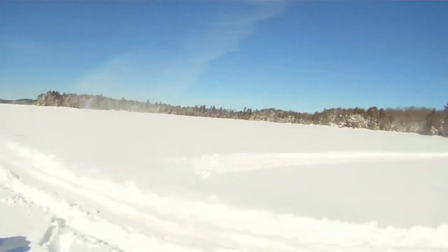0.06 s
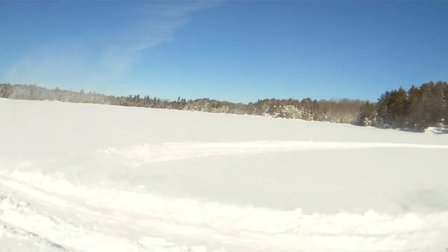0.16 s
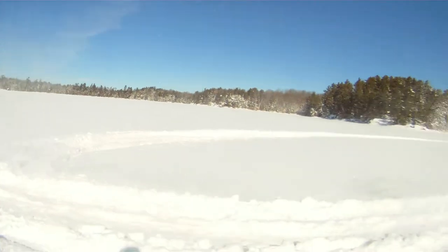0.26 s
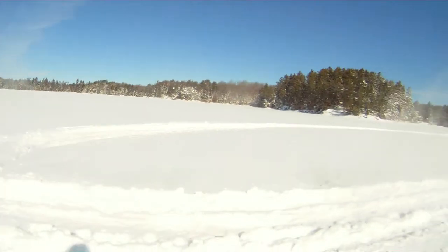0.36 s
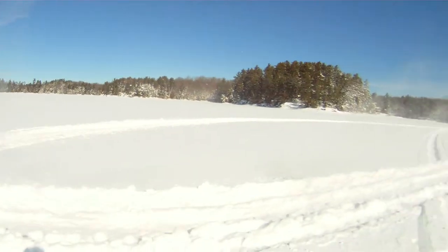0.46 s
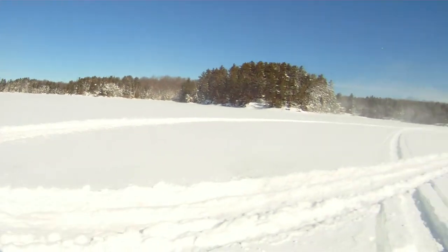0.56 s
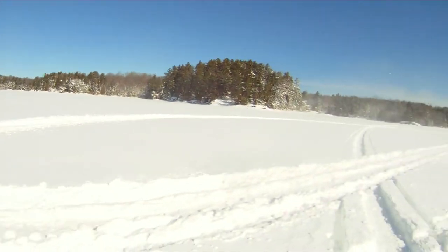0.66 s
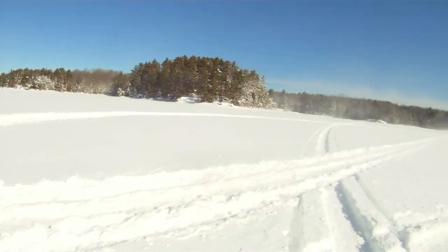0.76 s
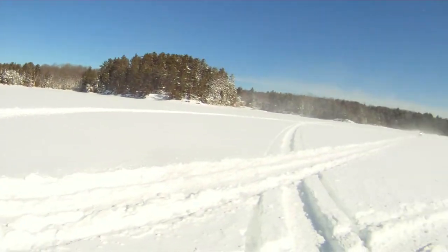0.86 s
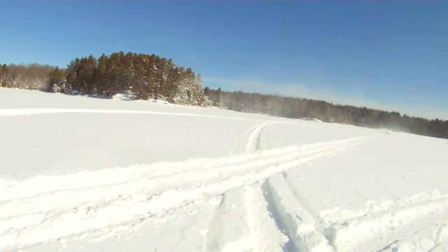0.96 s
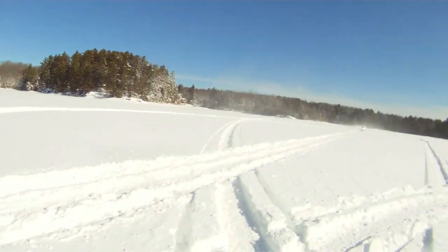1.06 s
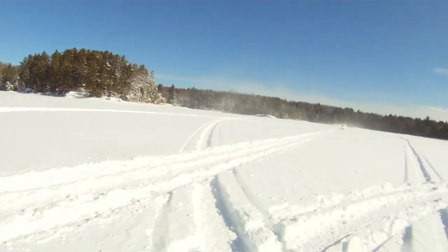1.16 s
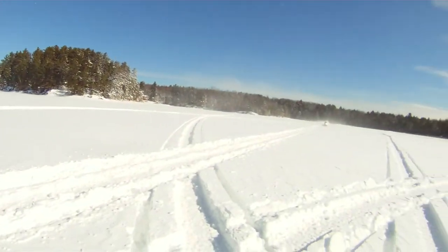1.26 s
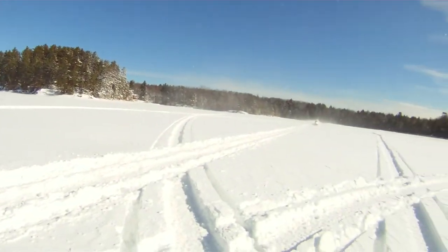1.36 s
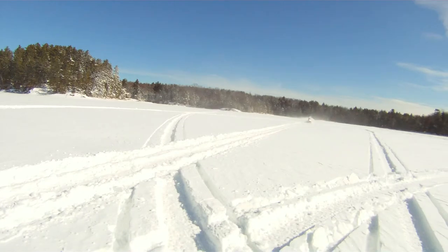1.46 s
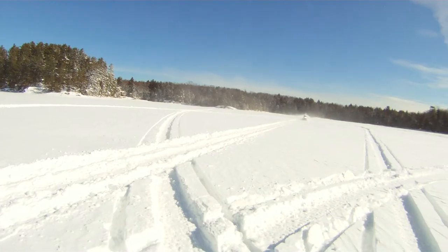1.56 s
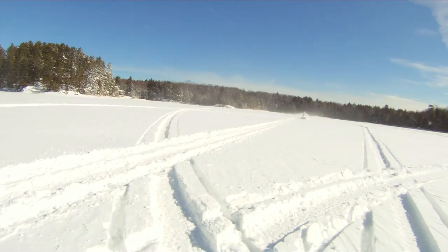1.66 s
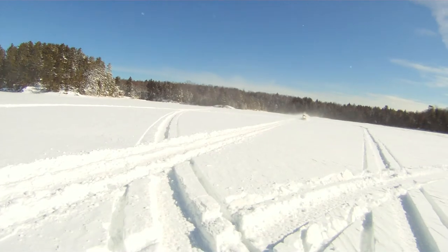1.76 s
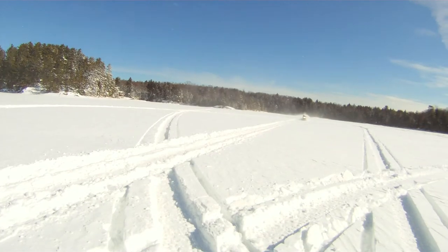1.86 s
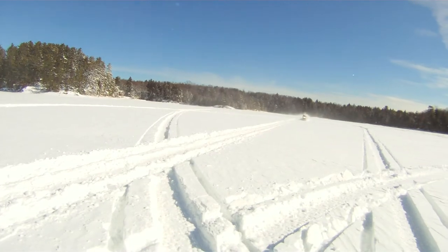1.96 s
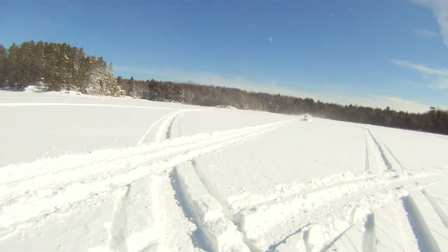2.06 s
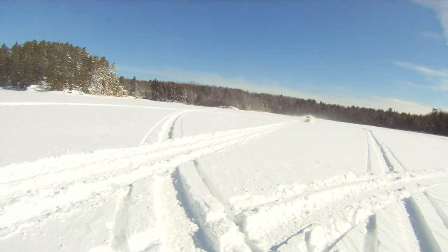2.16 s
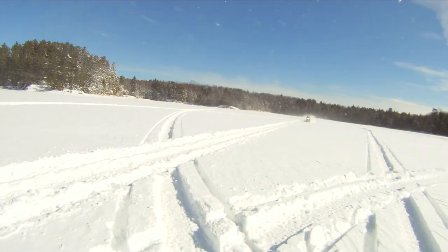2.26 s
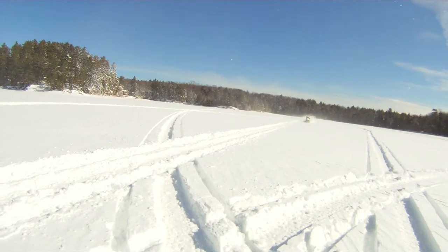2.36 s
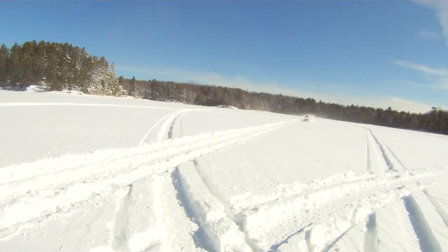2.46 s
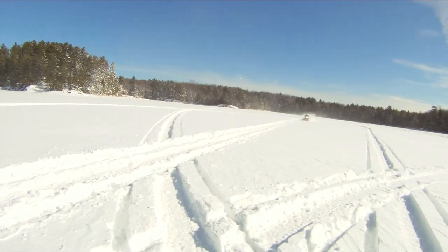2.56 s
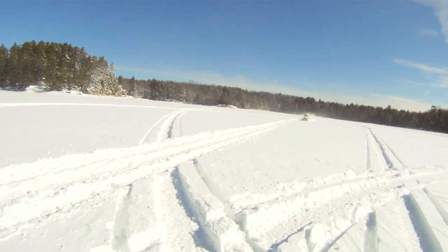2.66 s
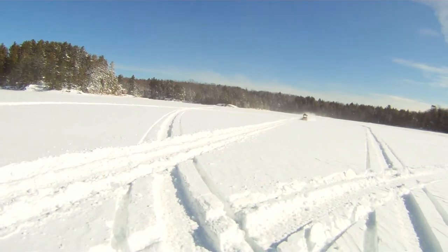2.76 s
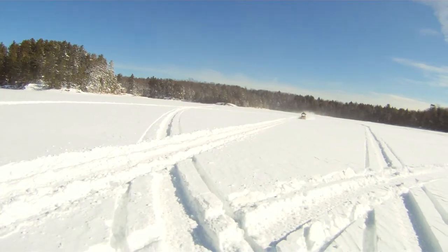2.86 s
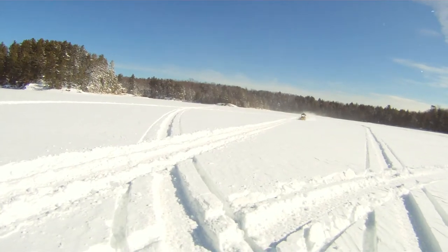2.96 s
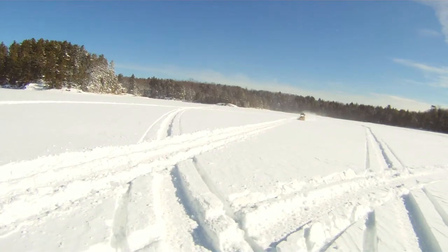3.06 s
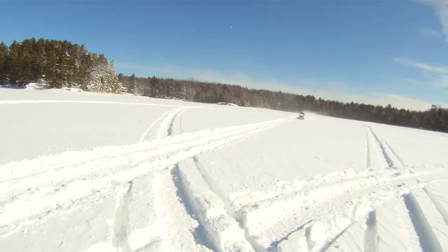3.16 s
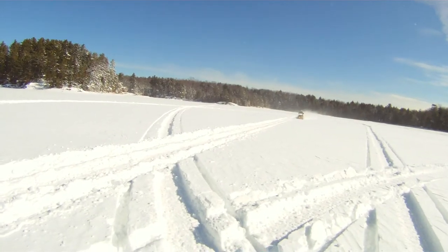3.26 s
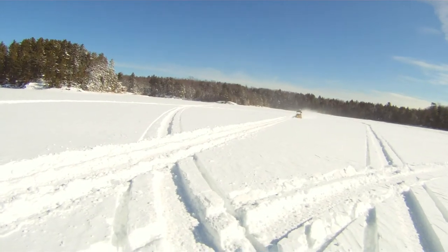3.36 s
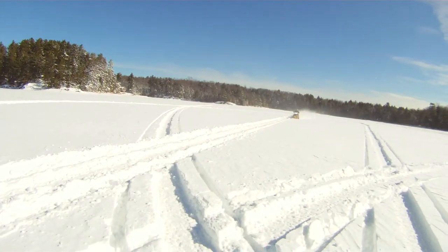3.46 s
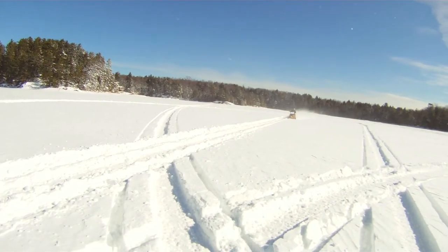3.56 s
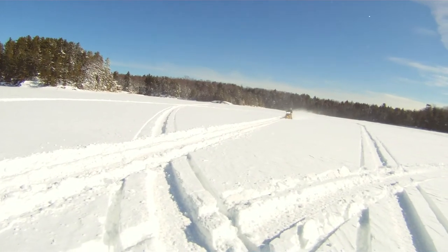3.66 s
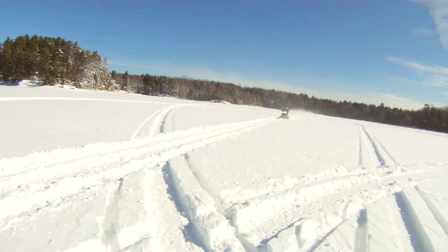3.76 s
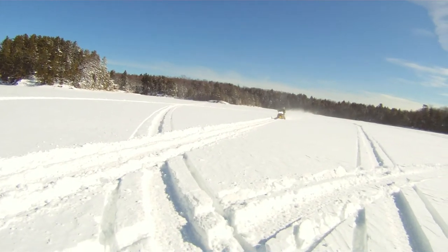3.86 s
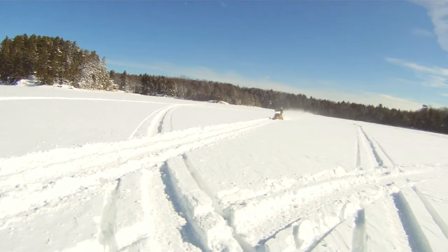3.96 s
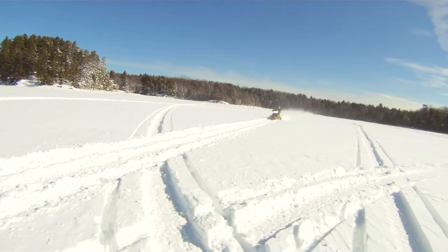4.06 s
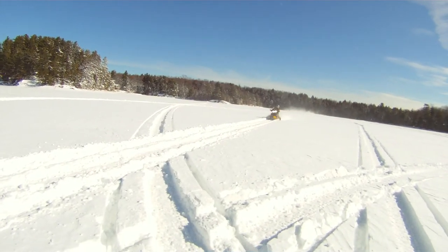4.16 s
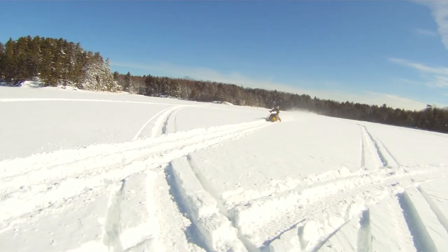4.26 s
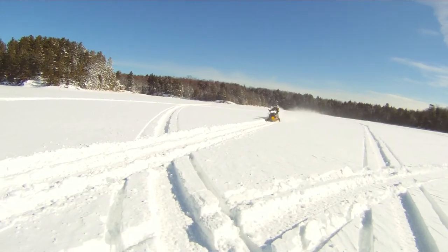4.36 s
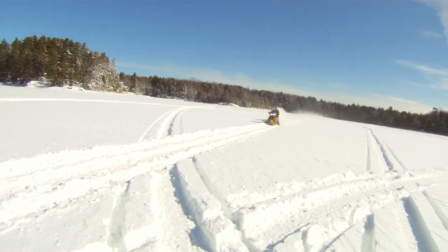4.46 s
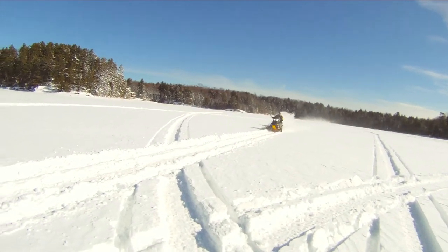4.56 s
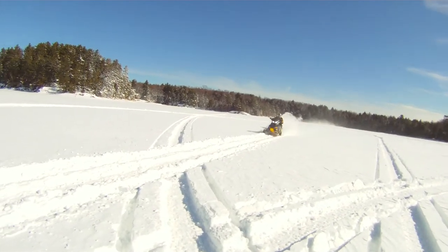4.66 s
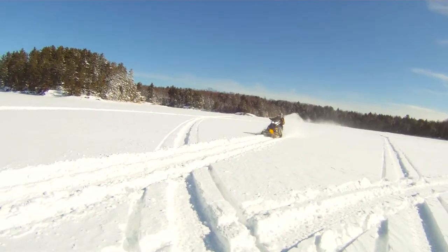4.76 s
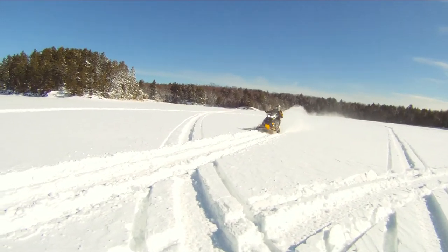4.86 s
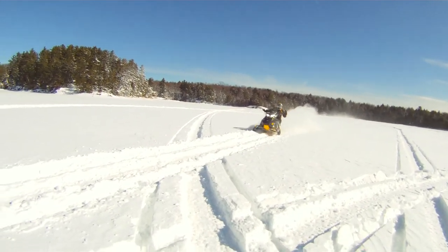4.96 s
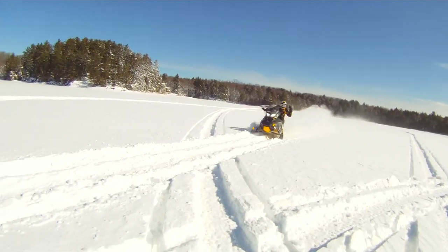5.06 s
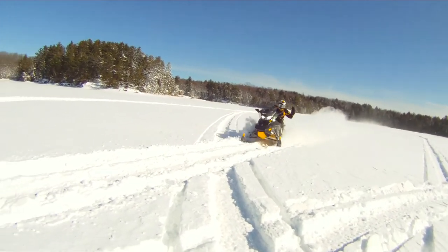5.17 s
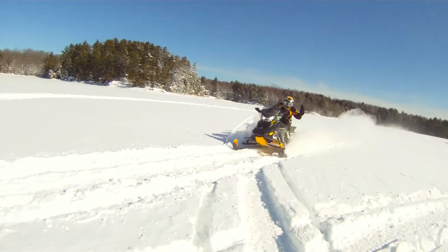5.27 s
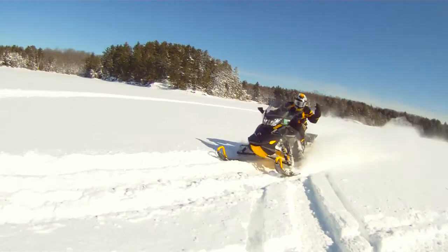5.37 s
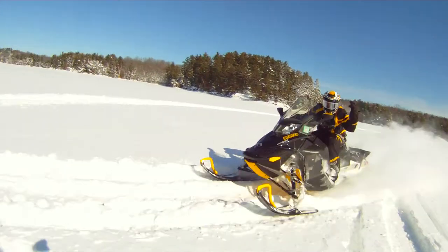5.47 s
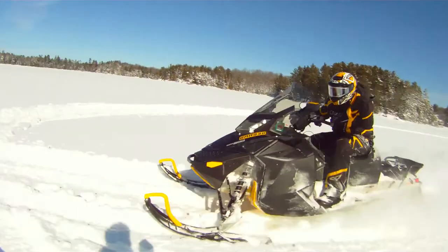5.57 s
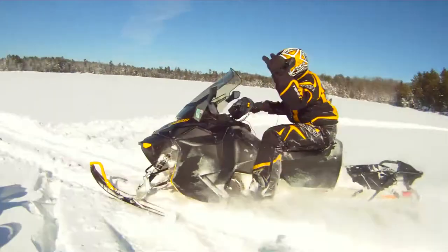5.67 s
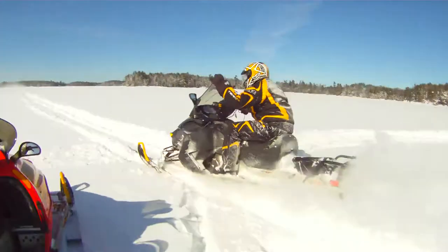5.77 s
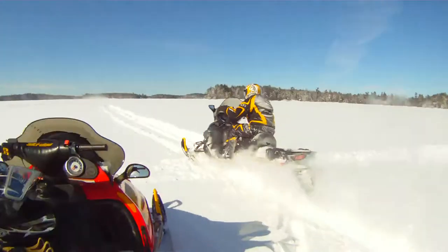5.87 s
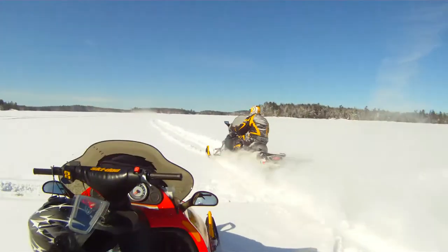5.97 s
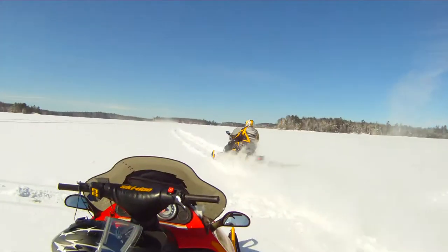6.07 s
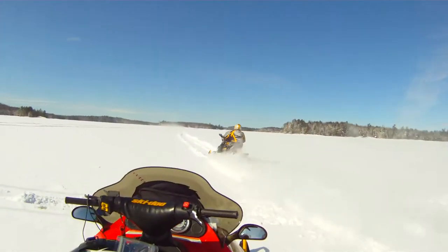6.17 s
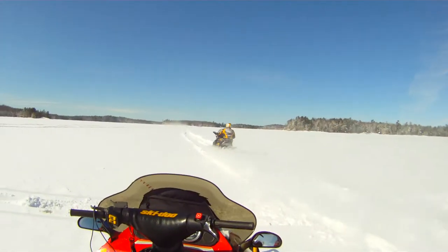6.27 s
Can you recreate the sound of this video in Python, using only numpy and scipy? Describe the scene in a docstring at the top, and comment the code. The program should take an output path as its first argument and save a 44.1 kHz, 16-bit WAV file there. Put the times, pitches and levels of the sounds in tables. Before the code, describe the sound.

On a quiet frozen lake one sled's thin buzz fades out, another builds to a raspy, clattering close pass and falls lower as it leaves.

```python
"""Open snow on a frozen lake, two snowmobiles, a small camera with faint hiss, whine, ticks and soft buffets.
At first one sled drones away from about 33 m: a thin two-stroke note over fading track clatter and snow hiss.
From about 2.7 s a second takes over, some 70 m out; its muffled treble opens up near 4 s, its throttle eases
near 4.5 s, and at 5.8 s it races by 4 m from the microphone and drops in pitch. Exhausts are harmonics of
the crankshaft, the track is a hum of its lugs with coloured noise for clatter, and thrown snow is a hiss."""
import sys
import numpy as np
from scipy import signal
from scipy.fft import rfft, irfft, next_fast_len
from scipy.io import wavfile

SR = 44100
rng = np.random.default_rng(int(sys.argv[2]) if len(sys.argv) > 2 else 0)


def generate_wav(sig):
    """Save sig (samples, or channels by samples) to the path in sys.argv[1] as 16-bit PCM at SR."""
    pcm = np.round(np.clip(np.atleast_2d(sig).T, -1, 1) * 32767).astype(np.int16)
    wavfile.write(sys.argv[1], SR, pcm)


N = 278271
TIME = np.arange(N) / SR  # [s]

# Spectra give relative levels: each finished note or noise is scaled to rms 1 before its own level is set.
# camera hiss: (frequency [Hz], density [dB per Hz])
CAMERA_HISS = [(30, -14), (90, -16), (250, -27), (600, -7), (1500, 9), (3200, -1.5), (5000, 2), (7300, -2),
               (8700, -2), (9400, -9), (10200, -4), (12000, -10), (14500, -5), (15500, -18)]
# whine of the camera's electronics: (frequency [Hz], rms level [dB])
WHINE = [(7838, -90), (7897, -72), (7957, -93)]
# colour of the low buffets: (frequency [Hz], density [dB per Hz])
BUFFET_COLOUR = [(25, -26), (45, 0), (70, -0.5), (150, 2), (280, -1), (450, -5.5), (900, -12)]
# soft low buffets on the camera: (time [s], half length [s], level [dB])
BUFFETS = [(0.659, 0.0061, -62.5), (0.724, 0.01, -63), (1.62, 0.034, -76), (2.462, 0.037, -71.5),
           (2.616, 0.047, -73.5), (2.761, 0.0081, -67.5), (4.384, 0.024, -75)]
# ticks of the camera housing: (time [s], peak level [dB], ring frequency [Hz])
TICKS = [(1.823, -42, 5500), (2.0347, -50, 6040), (2.0585, -49, 5650), (2.3571, -41.5, 5200),
         (2.4448, -31.5, 5300), (2.5434, -39, 5460), (3.7207, -43.5, 8140), (4.3494, -36, 6100)]
# brief rustle at the camera: time and half length [s], level [dB]
RUSTLE_S, RUSTLE_LENGTH_S, RUSTLE_DB = 2.365, 0.055, -60
TOP_HZ = 15330  # upper limit of the camera

# sled going away: crankshaft rate and distance at the start
LEAVING_HZ, LEAVING_START_M = 132.4, 32.7
# exhaust note from far behind: (multiple of the crankshaft rate, level [dB])
NOTE_FAR = [(2, -28), (4, -14.5), (5, -18.5), (7, -27), (9, -8.5), (10, 1), (12, -4.5), (14, -19)]
# uneven hum of the lugs of the far track: (multiple of the lug rate, level [dB])
LUGS_FAR = [(1, -8.5), (2, -8.5), (5, -5.5), (6, 5.5), (9, -17), (14, 3)]
# low rumble of either track: (frequency [Hz], density [dB per Hz])
RUMBLE = [(30, -43), (70, -20), (130, -10), (220, -11.5), (340, -1), (480, -3), (700, 2), (1000, 8),
          (1200, 0.5), (1450, 2), (1900, -49)]
# track clatter at a distance: (frequency [Hz], density [dB per Hz])
CLATTER_FAR = [(700, -44), (1150, -26), (1320, 1), (1550, 1), (1780, -4), (2000, -7), (2300, -13),
               (2700, -27), (3600, -63)]
# changes in the far clatter: (time [s], half length [s], gain [dB])
SWELLS = [(0.083, 0.21, -0.5), (1.09, 0.11, 6.5), (1.535, 0.33, 11), (2.44, 0.4, 10.5)]
# bursts of snow thrown by the leaving sled: (time [s], half length [s], gain [dB])
BURSTS = [(0.325, 0.16, 5.5), (0.706, 0.18, 6.5)]

# the pass: closest approach, speed of both sleds, gap to the camera, moment the second sled takes over
PASS_S, SPEED_M_S, CLOSEST_M, HANDOVER_S = 5.769, 22.5, 4.2, 2.73
# passing engine, eased on the way in and again as it goes by: (time [s], crankshaft rate [Hz])
ENGINE = [(3.65, 127.1), (4.12, 129.3), (4.31, 131.5), (4.57, 126.2), (4.79, 126.8), (5.05, 130.9),
          (5.38, 131.1), (5.52, 131.7), (5.76, 131), (5.92, 129), (6.31, 130.4)]
FULL_THROTTLE_HZ, LOAD_DB_PER_HZ = 131.1, 0.67  # exhaust and clatter are quieter below this rate
EASED_S, EASED_LENGTH_S = 4.51, 0.26  # the exhaust takes on its eased colour
# exhaust note from ahead: (multiple of the crankshaft rate, level [dB])
NOTE_AHEAD = [(4, -19.5), (5, -24), (6, -11), (7, -23), (8, -7.5), (9, -5), (10, 3.5), (11, -48), (12, -16),
              (13, -25), (14, -6.5), (15, -24), (16, -15), (18, -23.5)]
# exhaust note with the throttle eased: (multiple of the crankshaft rate, level [dB])
NOTE_EASED = [(1, -32), (2, -52), (3, -39), (4, -15), (5, -19), (6, -9.5), (7, -12), (8, -21), (9, -9),
              (10, 7), (11, -33), (12, -20), (13, -4.5), (14, -19), (15, -3.5), (16, -18), (17, -13),
              (18, -23)]
# exhaust note from the side: (multiple of the crankshaft rate, level [dB])
NOTE_SIDE = [(4, -8), (5, -1.5), (6, 2.5), (7, -18), (8, -5), (9, 3), (10, -4), (11, 7), (12, -23),
             (13, -14), (14, 2), (15, 6.5), (16, -30), (17, -9), (19, -8.5)]
# exhaust note from behind: (multiple of the crankshaft rate, level [dB])
NOTE_BEHIND = [(1, -39), (2, -32), (3, -14.5), (4, -33), (5, -8.5), (6, -5), (7, -22), (8, -3), (9, -1.5),
               (10, -0.5), (11, -1), (12, 3.5), (13, -16), (14, 4.5), (15, 0.5), (16, -0.5), (17, -2.5)]
# upper exhaust partials: (frequency [Hz], level [dB])
RASP = [(2500, -4.5), (2800, -9), (3070, -6.5), (3400, -6), (4100, -4), (4450, 0), (4900, -5), (5600, 1.5),
        (6400, -22), (7500, 4.5)]
# hum of the lugs of the near track: (multiple of the lug rate, level [dB])
LUGS_NEAR = [(1, 5.5), (2, 1), (3, 5), (4, -21)]
# track clatter close by: (frequency [Hz], density [dB per Hz])
CLATTER_NEAR = [(700, -41), (1100, 1), (1380, 5.5), (1620, -2.5), (1850, 4), (2050, 2.5), (2250, -21),
                (2700, -17.5), (3600, -31)]
# thrown snow from ahead: (frequency [Hz], density [dB per Hz])
SPRAY_AHEAD = [(2000, -25), (2700, -9.5), (3400, -4.5), (4400, 0.5), (5600, 0.5), (7000, -1.5),
               (8600, -8.5), (9800, -22.5), (13000, -31.5), (15300, -26)]
# thrown snow from alongside: (frequency [Hz], density [dB per Hz])
SPRAY_ALONGSIDE = [(1410, -10), (2400, 0.5), (2460, -8.5), (3080, -3.5), (3320, -7.5), (3680, -2),
                   (5330, 0), (7160, -10.5), (9100, -21.5), (10200, -30.5), (13200, -37), (14600, -31),
                   (15300, -39)]
# thrown snow from behind: (frequency [Hz], density [dB per Hz])
SPRAY_BEHIND = [(2000, -24), (2600, -6), (3200, -18), (3600, -1.5), (4400, -3.5), (5200, 3), (6400, -6),
                (8500, -15), (10200, -26.5), (13000, -38), (15300, -33)]
BEAM_POWER = 2.78  # how narrowly the sound is aimed along the sled
# parts of the passing sled, each:
# (level alongside [dB], gain ahead [dB], gain behind [dB], loss over snow [dB per m])
EXHAUST_PART = (-25.5, 9.5, -7, 0.41)
BOOM_PART = (-47, 2, -8.5, 0.56)
RASP_PART = (-41, 8.5, -4.5, 0.17)
LUG_PART = (-35.5, -16.5, -7.5, 0.5)
RUMBLE_PART = (-32.5, -8.5, -9, 0.32)
CLATTER_PART = (-29, -3.5, -5, 0.02)
SPRAY_PART = (-29.5, -1, -5.5, 0.32)
# the treble of the approach is muffled, most of all just before it opens up
OPENS_S, MUFFLED_DB, DIP_S, DIP_LENGTH_S, DIP_DB = 3.93, -6, 3.79, 0.19, -9.5
# from that dip until this moment the lower half of the rasp is weak against the upper
LOW_RASP_OPENS_S, LOW_RASP_DB = 4.5, -7.5


def undb(db):
    """Decibels to gain."""
    return 10 ** (np.asarray(db) / 20)


def unit(x):
    """Scale to rms 1."""
    return x / np.sqrt(np.mean(x ** 2))


def curves(table):
    """Each column of a table, joined by straight lines in time."""
    s, *columns = np.transpose(table)
    return [np.interp(TIME, s, column) for column in columns]


def step(at_s, width_s):
    """Smooth rise from 0 to 1."""
    return .5 + .5 * np.tanh((TIME - at_s) / width_s)


def bump(at_s, width_s):
    """Smooth swell to 1 and back."""
    return np.exp(-((TIME - at_s) / width_s) ** 2)


def walk(rate):
    """Random wander with a spread near 1, given a new target `rate` times a second."""
    knots = rng.standard_normal(4096)
    return 1.17 * np.interp(TIME * rate, np.arange(len(knots)), knots)


def gain_at(hz, points):
    """Gain of a (Hz, dB) spectrum at given frequencies; it falls 40 dB in the octave beyond each end."""
    f, db = np.transpose(points)
    edges_hz = np.r_[f[0] / 2, f, f[-1] * 2]
    edges_db = np.r_[db[0] - 40, db, db[-1] - 40]
    return undb(np.interp(np.log(hz + 1e-3), np.log(edges_hz), edges_db))


def colour(x, points):
    """Filter by a (Hz, dB) spectrum."""
    size = next_fast_len(N)
    hz = np.arange(size // 2 + 1) * SR / size
    return irfft(rfft(x, size) * gain_at(hz, points), size)[:N]


def noise(points):
    """Coloured noise of rms 1."""
    return unit(colour(rng.standard_normal(N), points))


def rotation(hz, jitter):
    """Turns made by a shaft whose rate jitters from cycle to cycle."""
    return np.cumsum(hz * (1 + jitter * walk(130))) / SR


def partials(turns, multiples, gains, flutter_db, flutter_rate):
    """Harmonics of a rotation; moving air and uneven snow make each one swell and fade."""
    out = 0
    for k, gain in zip(multiples, gains):
        # the pipe delays each harmonic by its own amount and so smears the pulse
        cycles = k * turns + k ** 3 / np.sqrt(131)
        angle = (2 * np.pi * (cycles % 1)).astype(np.float32)
        flutter = undb(flutter_db * walk(flutter_rate))
        out = out + gain * flutter * np.sin(angle)
    return unit(out)


def note(turns, orders, flutter_db, flutter_rate):
    """Partials of a rotation from a (multiple, dB) table."""
    multiples, db = np.transpose(orders)
    return partials(turns, np.round(multiples), undb(db), flutter_db, flutter_rate)


def throb(turns, depth, slap_db, slap_rate):
    """Loudness of running gear: surges with the two firings of each turn, and uneven slaps of the track."""
    firing = 1 + depth * (np.cos(4 * np.pi * turns) + 0.77 * np.cos(2 * np.pi * turns))
    return unit(firing * undb(slap_db * walk(slap_rate)))


def spreading(metres, from_m, loss_db_per_m):
    """Gain of a sound that thins out with distance and is soaked up by the snow."""
    return from_m / metres * undb(-loss_db_per_m * (metres - from_m))


def camera_ticks():
    """Dry ticks: the plastic housing rings for only a few cycles, with a weak overtone."""
    ticks = np.zeros(N)
    for s, db, hz in TICKS:
        age = np.maximum(TIME - s, 0)
        swing = age / 0.00017  # the envelope peaks after 0.17 ms
        overtone = undb(-17.5) * np.sin(2 * np.pi * 1.87 * hz * age)
        ring = np.sin(2 * np.pi * hz * age) + overtone
        ticks += undb(db) * swing * np.exp(1 - swing) * ring
    return ticks


def camera_buffets():
    """Low noise swelling briefly, over a faint flutter that grows as the second sled nears."""
    swell = sum(undb(db) * np.exp(-.5 * ((TIME - s) / length) ** 2) for s, length, db in BUFFETS)
    flutter = undb(-81 + 3.1 * walk(16) + 3 * step(4.1, 0.3))
    return (swell + flutter) * noise(BUFFET_COLOUR)


def camera():
    """Right at the microphone: noise for hiss and rustle, steady sines for whine, buffets and ticks."""
    hiss = undb(-67.0) * noise(CAMERA_HISS)
    whine = 0
    for hz, db in WHINE:
        whine = whine + undb(db) * np.sqrt(2) * np.sin(2 * np.pi * (hz * TIME + rng.random()))
    rustle_noise = noise([(1200, 4), (2700, -2), (5500, -3), (9000, -18)])
    rustle = undb(RUSTLE_DB) * bump(RUSTLE_S, RUSTLE_LENGTH_S) * rustle_noise
    return hiss + whine + camera_buffets() + rustle + camera_ticks()


def snow_echo(gear, metres):
    """The snow returns an inverted echo; its lag shrinks with distance and sweeps a comb upwards."""
    lag_s = 0.001038 * LEAVING_START_M / metres
    echo = 0.38 * bump(0.3, 0.55)
    return (gear - echo * np.interp(TIME - lag_s, TIME, gear)) / np.sqrt(1 + echo ** 2)


def leaving_sled():
    """The first machine, already far: crankshaft harmonics that outlast the noise of the track and snow."""
    metres = LEAVING_START_M + SPEED_M_S * TIME

    def faded(loss_db_per_m):
        return spreading(metres, LEAVING_START_M, loss_db_per_m)

    turns = rotation(LEAVING_HZ * (1 + 0.002996 * walk(3)), jitter=0.00772)
    # the note is lifted at the start and swells once more from far away
    exhaust = undb(-51 + 4 * bump(0, 0.2) + 14 * bump(4.0, 0.75)) * faded(0.16)
    exhaust = exhaust * note(turns, NOTE_FAR, flutter_db=3.3, flutter_rate=20)
    lug_turns = rotation(185.8 * (1 + 0.0032 * walk(3)), jitter=0.0093)  # lugs a second
    lugs = undb(-59.5) * faded(0.24) * note(lug_turns, LUGS_FAR, flutter_db=2.5, flutter_rate=8.87)
    rumble = undb(-57.5) * faded(0.24) * noise(RUMBLE)
    swell_db = sum(db * bump(s, length) for s, length, db in SWELLS)
    clatter = undb(-51.0 + swell_db) * faded(0.19) * noise(CLATTER_FAR)
    burst_db = sum(db * bump(s, length) for s, length, db in BURSTS)
    snow = noise([(1900, 8), (2250, 1.0), (2620, 1.5), (3400, -3), (5200, -1.5), (6500, -15.5), (8500, -22)])
    snow *= undb(-55.0 + burst_db) * faded(0.18)
    gear = (rumble + clatter + snow) * throb(turns, depth=0.032, slap_db=1.0, slap_rate=70)
    track_fade = np.sqrt(1 - step(HANDOVER_S, 0.087))
    return exhaust + track_fade * (lugs + snow_echo(gear, metres))


def path():
    """Distance of the passing sled, and its heading: 1 coming straight on, -1 going away."""
    to_go = SPEED_M_S * (PASS_S - TIME)
    metres = np.hypot(to_go, CLOSEST_M)
    return metres, to_go / metres


def carried(part):
    """Gain of one part of the passing sled, from its distance and the side that faces the camera."""
    db, ahead_db, behind_db, loss_db_per_m = part
    metres, heading = path()
    aimed_db = np.where(heading > 0, ahead_db, behind_db) * np.abs(heading) ** BEAM_POWER
    return undb(db + aimed_db) * spreading(metres, CLOSEST_M, loss_db_per_m)


def thrown_snow():
    """Hiss of the snow, whose colour turns with the side of the sled that faces the camera."""
    arrived, gone = step(5.35, 0.65), step(5.97, 0.083)
    beside = np.sqrt(1 - gone) * noise(SPRAY_ALONGSIDE) + np.sqrt(gone) * noise(SPRAY_BEHIND)
    return np.sqrt(1 - arrived) * noise(SPRAY_AHEAD) + np.sqrt(arrived) * beside


def track_clatter():
    """Coloured noise of the track, its far colour giving way to the near one as the sled closes in."""
    near = step(4.73, 0.37)
    return np.sqrt(1 - near) * noise(CLATTER_FAR) + np.sqrt(near) * noise(CLATTER_NEAR)


def track_lugs(shaft_hz):
    """Hum of the lugs, at a fixed ratio to the engine, but the track passes 0.06 s later."""
    lug_hz = 2.65 * np.interp(TIME - .06, TIME, shaft_hz)
    return note(rotation(lug_hz, jitter=0.0101), LUGS_NEAR, flutter_db=2.5, flutter_rate=19)


def singing_drive(turns):
    """Two high multiples of the crankshaft: the drive sings under full load, from about 5.0 to 5.5 s."""
    full_load = step(5.0, .06) * (1 - step(5.5, .06))
    return full_load * note(turns, [(22, -6), (32, 0)], flutter_db=0.0, flutter_rate=9)


def exhaust_rasp(turns, shaft_hz):
    """Upper partials of the exhaust; two cylinders fire in turn, so even multiples are the stronger ones."""
    upper = np.arange(19, 53)
    odd_db = -3 * (upper % 2)
    gains = gain_at(upper * np.median(shaft_hz), RASP) * undb(odd_db)
    low = undb(LOW_RASP_DB * step(DIP_S, 0.17) * (1 - step(LOW_RASP_OPENS_S, 0.05)))
    gains = [gain * low if k < 30 else gain for k, gain in zip(upper, gains)]
    return partials(turns, upper, gains, flutter_db=3, flutter_rate=11)


def exhaust_note(turns, alongside):
    """Crankshaft harmonics that change with the throttle and with the side that faces the camera."""
    eased = 0.81 * bump(EASED_S, EASED_LENGTH_S)
    behind = step(PASS_S, 0.04)
    ahead = (1 - eased) * note(turns, NOTE_AHEAD, flutter_db=0.9, flutter_rate=12)
    ahead += eased * note(turns, NOTE_EASED, flutter_db=4.5, flutter_rate=10)
    rear = undb(3) * note(turns, NOTE_BEHIND, flutter_db=2, flutter_rate=16)
    side = note(turns, NOTE_SIDE, flutter_db=4.5, flutter_rate=30)
    along_path = (1 - behind) * ahead + behind * rear
    return (1 - alongside) * along_path + alongside * side


def passing_sled():
    """The second machine comes from far off, is roughest alongside and drops in pitch by the Doppler shift."""
    engine_hz, = curves(ENGINE)
    _, heading = path()
    shaft_hz = engine_hz / (1 - heading * SPEED_M_S / 343)  # speed of sound [m/s]
    load = undb(LOAD_DB_PER_HZ * (engine_hz - FULL_THROTTLE_HZ))
    treble = undb(MUFFLED_DB * (1 - step(OPENS_S, 0.062)) + DIP_DB * bump(DIP_S, DIP_LENGTH_S))
    alongside = bump(5.73, 0.16)
    turns = rotation(shaft_hz, jitter=.001 + .0025 * alongside)
    exhaust = load * carried(EXHAUST_PART) * exhaust_note(turns, alongside)
    # right alongside, the note growls
    exhaust *= 1 + 0.21 * alongside * walk(140)
    # two firings a turn make the boom
    boom = carried(BOOM_PART) * partials(turns, [2], [1], flutter_db=1.0, flutter_rate=14)
    rasp = treble * carried(RASP_PART) * exhaust_rasp(turns, shaft_hz)
    drive = undb(-50.0) * singing_drive(turns)
    lugs = carried(LUG_PART) * track_lugs(shaft_hz)
    rumble = carried(RUMBLE_PART) * noise(RUMBLE)
    clatter = load * carried(CLATTER_PART) * track_clatter()
    gear = (rumble + clatter) * throb(turns, depth=0.11, slap_db=1.5, slap_rate=90)
    spray = treble * carried(SPRAY_PART) * thrown_snow()
    spray *= throb(turns, depth=0.021, slap_db=1.03, slap_rate=110)
    fade_in = np.sqrt(step(HANDOVER_S, 0.36))
    return fade_in * (exhaust + boom + rasp + drive + lugs + gear + spray)


def scene():
    """Open snow gives no reverberation: just the camera and the two sleds."""
    return (camera() + leaving_sled() + passing_sled())[None]


def record(dry):
    """The camera cuts the top with a steep low-pass."""
    low_pass = signal.ellip(10, .2, 80, TOP_HZ, fs=SR, output="sos")
    return signal.sosfilt(low_pass, dry)


dry = scene()
out = record(dry)
generate_wav(out)
```